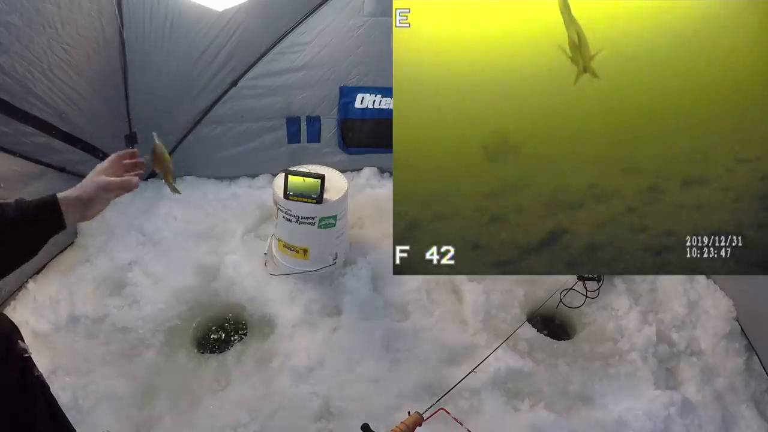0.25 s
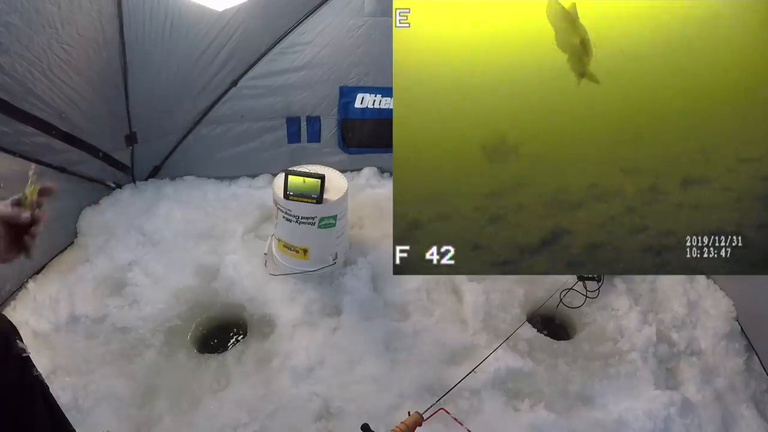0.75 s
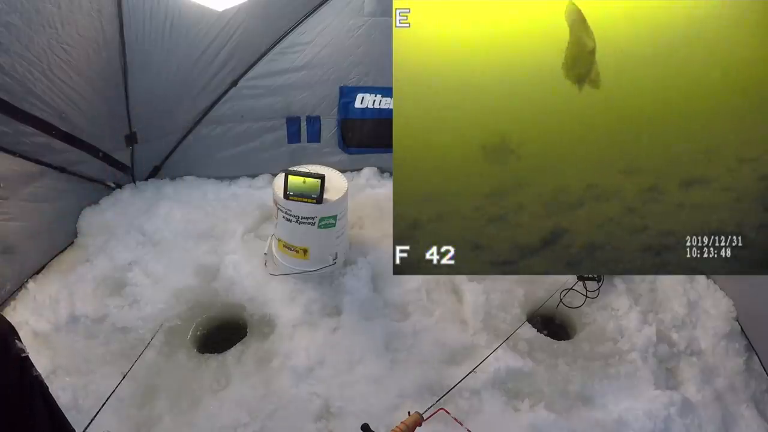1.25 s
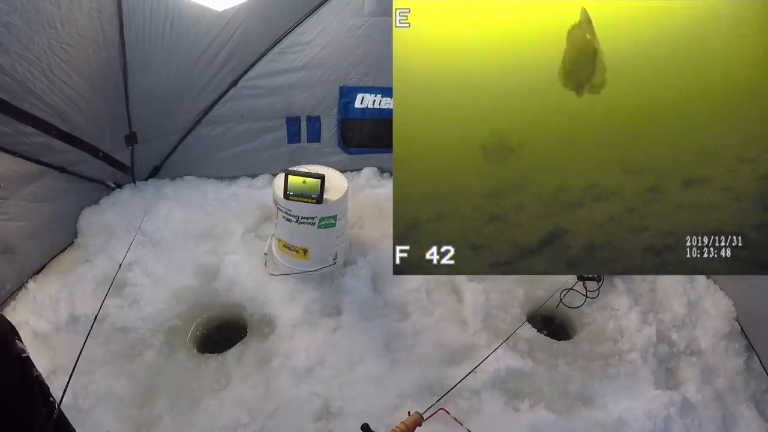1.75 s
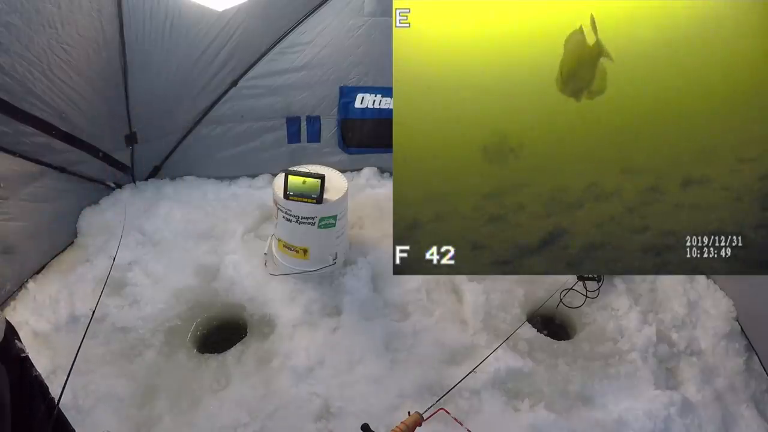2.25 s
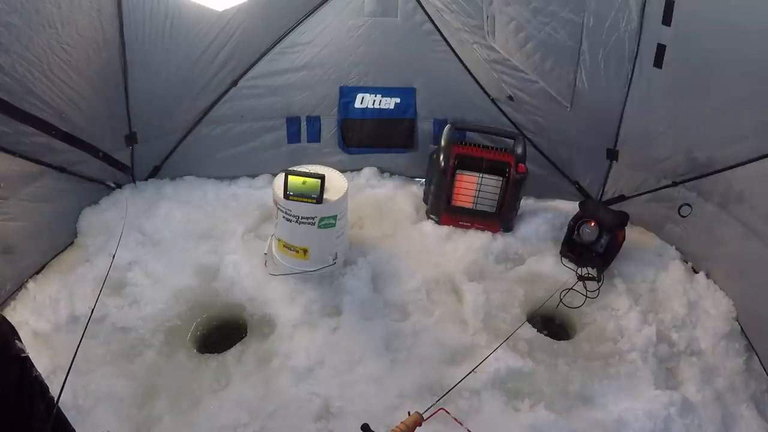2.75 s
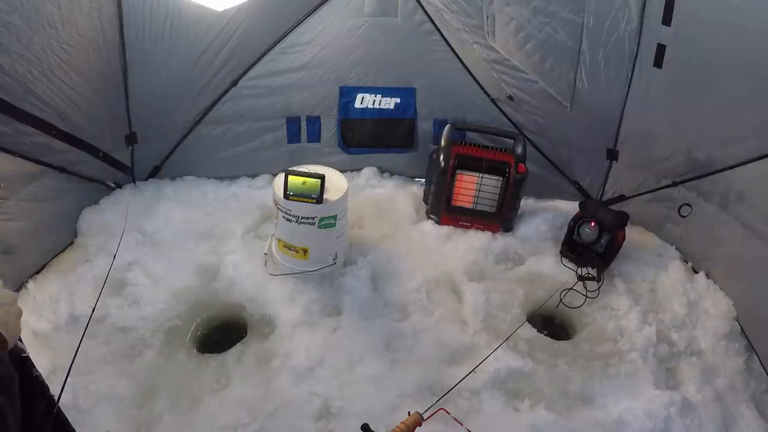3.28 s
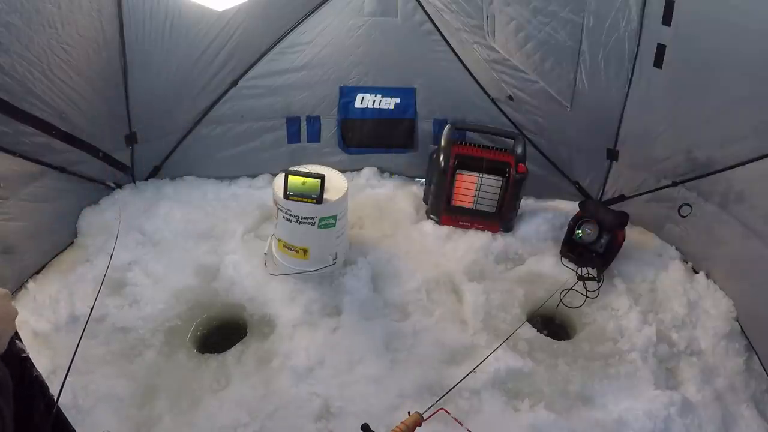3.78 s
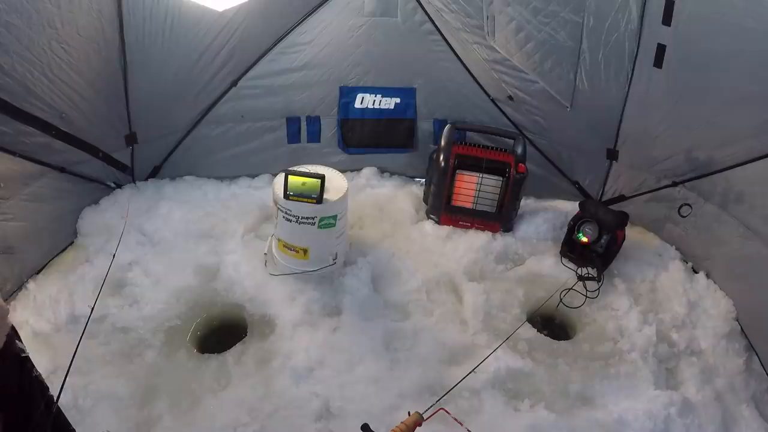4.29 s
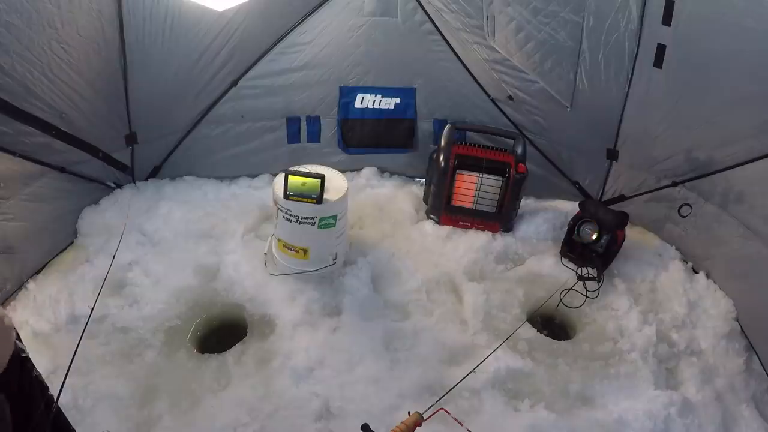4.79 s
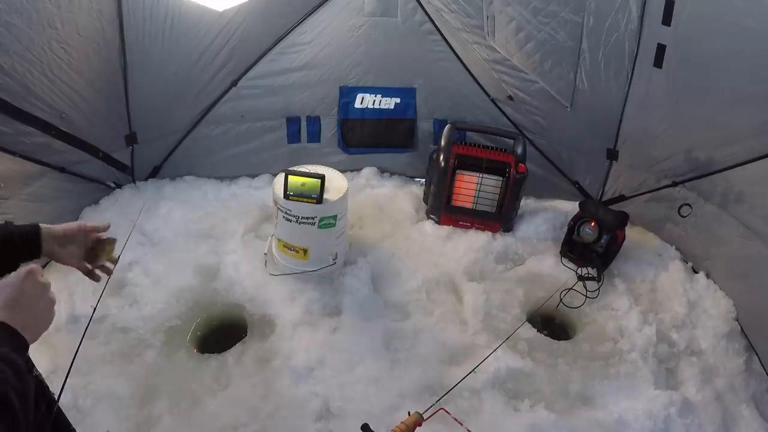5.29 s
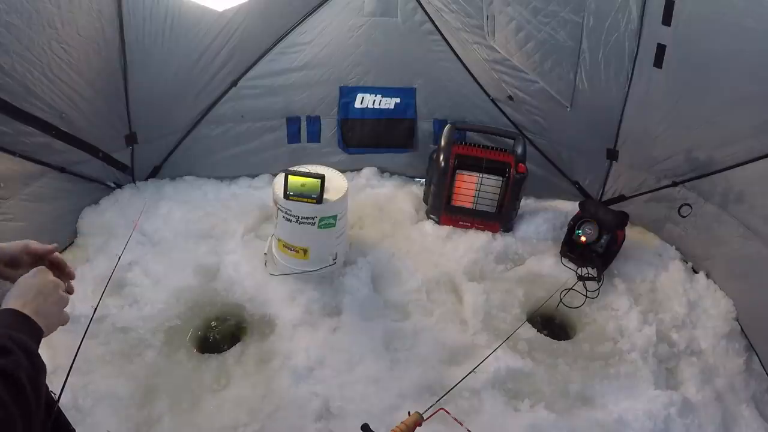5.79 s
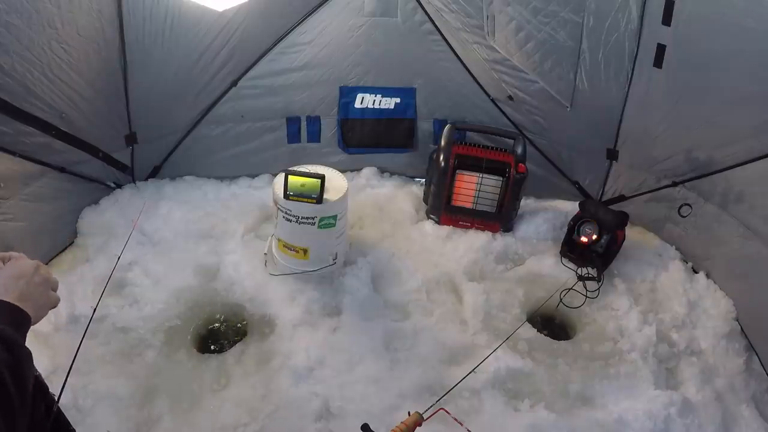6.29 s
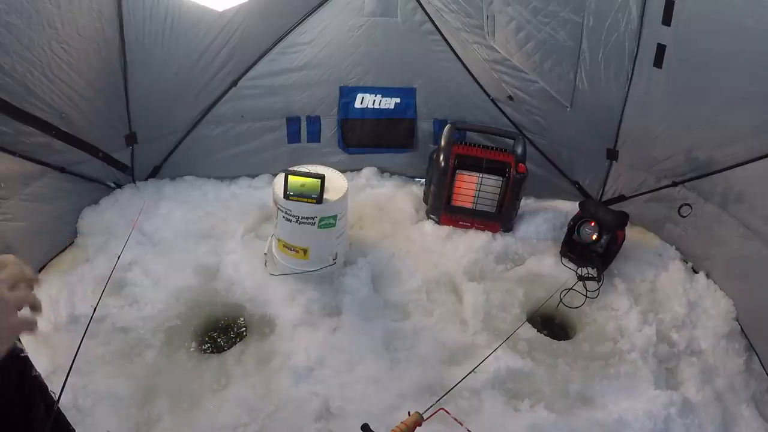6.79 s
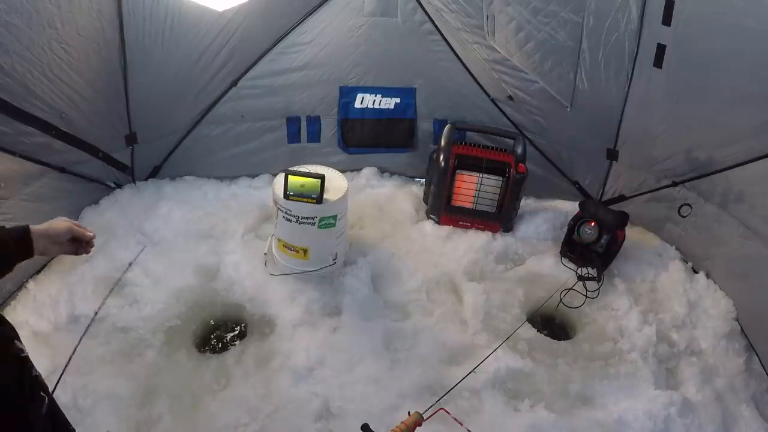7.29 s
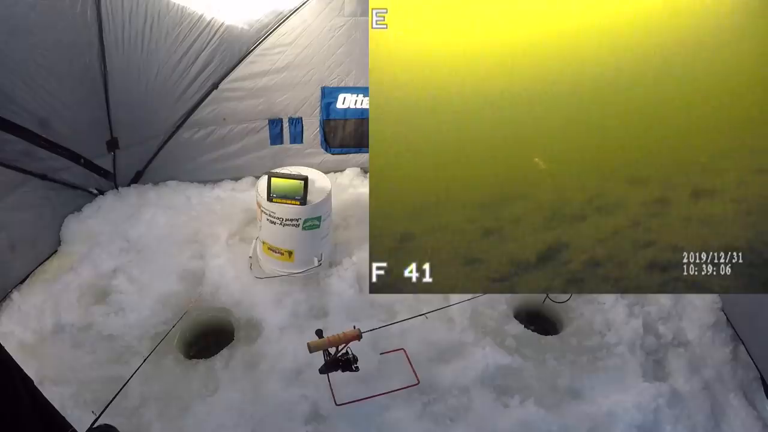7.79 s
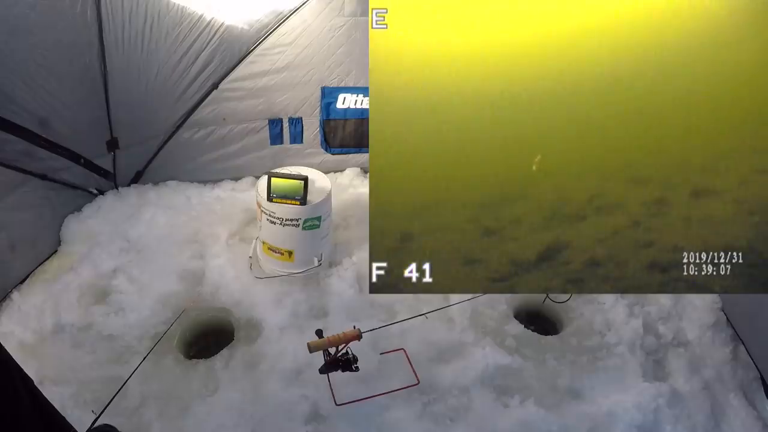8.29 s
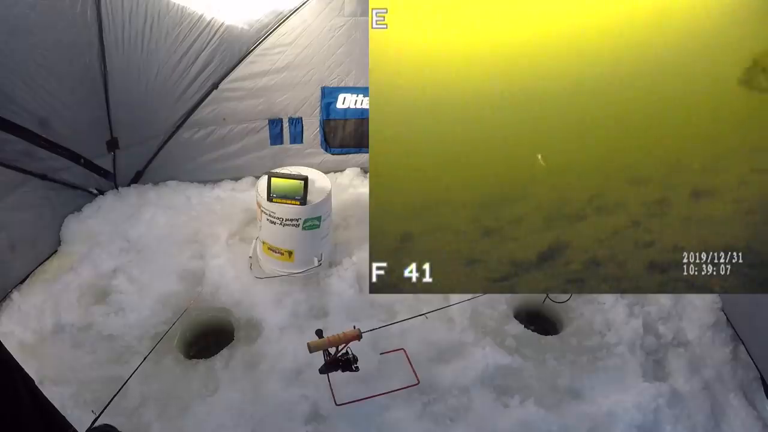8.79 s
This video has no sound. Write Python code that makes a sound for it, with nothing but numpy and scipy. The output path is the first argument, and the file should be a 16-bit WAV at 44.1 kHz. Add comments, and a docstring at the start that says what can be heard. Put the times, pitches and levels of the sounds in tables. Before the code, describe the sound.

A small motor hums steadily over a soft heater roar in a tent; knocks, a plopping splash with bubbles, then rustling and heavy thumps.

```python
"""A small motor spins a wheel and hums, over the soft roar of a gas heater, inside an ice-fishing tent.
The hum is sines on multiples of the turn rate; the roar and the deep rumble are coloured noise.
A fish dropped into the hole splashes: spray noise and ringing droplets, then bubbles of climbing pitch.
Clothes and boots rustle as grainy noise, dull knocks ring and die, wet ticks are short puffs of noise,
and a seat groans once by stick-slip. Two close microphone ports hear it all and add hiss."""
import sys
import numpy as np
from scipy import signal
from scipy.fft import rfft, irfft, next_fast_len
from scipy.io import wavfile
from scipy.ndimage import map_coordinates

SR = 44100
rng = np.random.default_rng(int(sys.argv[2]) if len(sys.argv) > 2 else 0)


def inscribe(sig):
    """Save sig as 16-bit PCM at rate SR to the path in sys.argv[1].

    A 1-D sig is mono; a 2-D sig holds one channel per row.
    Samples are clipped to [-1, 1] before scaling.
    """
    pcm = np.round(np.clip(np.atleast_2d(sig).T, -1, 1) * 32767)
    wavfile.write(sys.argv[1], SR, pcm.astype(np.int16))


N = 399105
T = np.arange(N) / SR
SIZE = next_fast_len(N + SR)   # FFT length, with room for tails
HZ = np.maximum(np.fft.rfftfreq(SIZE, 1 / SR), 1)


def amp(db):
    """dB to gain."""
    return 10 ** (np.asarray(db) / 20)


def rms_one(x):
    """Scale to rms 1."""
    return x / np.sqrt(np.mean(x ** 2))


def at_hz(points, column=1):
    """A column of a spectrum table at every FFT bin, interpolated over log frequency."""
    points = np.array(points)
    return np.interp(np.log(HZ), np.log(points[:, 0]), points[:, column])


def coloured(spectrum, source=None):
    """White noise (or a given source) through a spectrum; rms 1."""
    source = rng.standard_normal(N) if source is None else source
    return rms_one(irfft(rfft(source, SIZE) * amp(at_hz(spectrum)), SIZE)[:N])


def drift(rate):
    """Smooth random curve of spread about 1, with this many random knots per second."""
    knots = rng.standard_normal(400)
    coarse_t = T[::32]
    return np.interp(T, coarse_t, map_coordinates(knots, [coarse_t * rate], order=3, mode="wrap"))


def harmonics(per_s, orders, waver_db, waver_per_s):
    """Sines on multiples of a moving rate, in step once per turn, each wavering by itself."""
    turn = 2 * np.pi * np.cumsum(per_s) / SR
    out = np.zeros(N)
    for order, db in orders:
        level = np.sqrt(2) * amp(db + waver_db * drift(waver_per_s))
        out += level * np.sin(order * turn)
    return out


def swell(peak_s, db, rise, fall):
    """Power that climbs 20 dB in rise seconds to a peak and sinks 20 dB in fall seconds."""
    t = T[::16]
    away = np.maximum((peak_s - t) / rise, (t - peak_s) / fall)
    return np.interp(T, t, amp(2 * db - 40 * away))   # doubled dB: power, not amplitude


def band_noise(noise, low_hz, high_hz):
    """Noise kept between two band edges."""
    return signal.sosfilt(signal.butter(2, [low_hz, high_hz], "band", fs=SR, output="sos"), noise)


def add(out, s, sound):
    """Mix a short sound in at s seconds."""
    i = round(s * SR)
    out[i:i + len(sound)] += sound[:N - i]


TENT_T60_S, BLEND_KNOTS_PER_S = .09, 20
# How the left microphone port hears, against the right one.
# Columns: freq_hz, level_db, lead_rad, direct_share (share of the power in the left port, 0 to 1)
PORTS = [(100, 0, 0, 1), (300, -1.2, -.22, 1), (450, -3.5, -.4, 1), (560, -8, -.45, 1), (700, -15, -.3, .9),
         (800, -15, 1.6, .88), (900, -11, 1.9, .9), (1200, -3, 2.0, .8), (2000, 0, 1.2, .5),
         (3000, -1, 0, .3), (6000, 2, 0, .2), (12000, 1, 0, .1)]


def ports(x):
    """Two close ports: the left one has a dip and a phase turn; it also hears more of the tent walls."""
    t = np.arange(SR // 4) / SR
    # twelve patterns of echoes, each with its own left and right
    walls = rng.standard_normal((12, 2, len(t))) * amp(-60 * t / TENT_T60_S)
    walls /= np.sqrt(np.sum(walls ** 2, axis=2, keepdims=True))
    # the blend of echo patterns keeps changing at random, so no fixed colour stands out
    blend = np.array([amp(8 * drift(BLEND_KNOTS_PER_S)) for _ in walls])
    blend /= np.sqrt(np.sum(blend ** 2, axis=0))
    echoes = np.sum(rfft(x * blend, SIZE)[:, None] * rfft(walls, SIZE), axis=0)
    left = amp(at_hz(PORTS)) * np.exp(1j * at_hz(PORTS, column=2))
    left_share = at_hz(PORTS, column=3)
    share = np.array([left_share, (2 + left_share) / 3])
    heard = np.sqrt(share) * rfft(x, SIZE) + np.sqrt(1 - share) * echoes
    heard = heard * [left, np.ones_like(left)]
    # levels are given for the mean of both ports
    mean = np.sqrt(1 + abs(left) ** 2 + 2 * left.real * np.sqrt(share[0] * share[1])) / 2
    return irfft(heard / mean, SIZE)[:, :N]


HISS_MID_DB, HISS_SIDE_DB = -60, -50.5
# Colour of the hiss common to both ports. Columns: freq_hz, density_db (dB per Hz, relative)
HISS_MID = [(590, -9), (1000, -6), (1180, -2), (1340, -2), (2120, -6.5), (3540, -9), (4000, -11.5),
            (8860, -9.5), (13100, -19), (14500, -32)]
# Colour of the hiss opposed between the ports. Columns: freq_hz, density_db (dB per Hz, relative)
HISS_SIDE = [(100, -51), (140, 7.5), (300, 4.5), (600, -2), (750, 4.5), (985, 1.5), (1380, -4), (3080, -17),
             (3570, -21), (8720, -16), (12800, -26), (14500, -36)]


def hiss():
    """Steady microphone noise, one part equal in both ports and one of opposite sign."""
    common = amp(HISS_MID_DB) * coloured(HISS_MID)
    opposed = amp(HISS_SIDE_DB) * coloured(HISS_SIDE)
    return common + opposed * [[1], [-1]]


RUMBLE_START_DB, RUMBLE_FADE_DB_PER_S, RUMBLE_FLOOR_DB = -42, 12.5, -69.5   # dies away from the start
RUMBLE_BACK_S, RUMBLE_BACK_DB, RUMBLE_RISE_DB_PER_S = 8.88, -43.5, 70   # fully back from this time on
RUMBLE_SIDE_DB = -25   # part that differs between the ports, against the common part
# Colour of the deep shaking. Columns: freq_hz, density_db (dB per Hz, relative)
RUMBLE_COLOUR = [(8, -30), (20, -11), (36, -8), (46, -2), (52, -4), (59, 0), (68, -7), (100, -10),
                 (125, -25), (300, -110)]


def rumble():
    """Deep shaking noise that settles slowly and comes back at the end."""
    settling = amp(RUMBLE_START_DB - RUMBLE_FADE_DB_PER_S * T) + amp(RUMBLE_FLOOR_DB)
    back = amp(RUMBLE_BACK_DB - RUMBLE_RISE_DB_PER_S * np.maximum(RUMBLE_BACK_S - T, 0))
    common = coloured(RUMBLE_COLOUR)
    opposed = amp(RUMBLE_SIDE_DB) * coloured(RUMBLE_COLOUR)
    return (settling + back) * (common + opposed * [[1], [-1]])


ROAR_DB = -42.5
# Colour of the gas heater's roar. Columns: freq_hz, density_db (dB per Hz, relative)
ROAR = [(90, -73), (120, -12.5), (142, 1), (260, 0.5), (300, 1.5), (400, -2.5), (500, -1.5), (620, -2),
        (700, -8), (850, -14.5), (1100, -23.5), (2000, -35.5), (4000, -79)]


def heater():
    """The gas heater roars softly: low coloured noise whose level drifts a little."""
    return amp(ROAR_DB + 1.0 * drift(4.8)) * coloured(ROAR)


GROAN_S, GROAN_HALF_S = 8.643, .036   # slowest moment; this long before and after, slips are twice as fast
GROAN_SLIPS_PER_S, GROAN_DB, GROAN_FADE_DB = 330, -17, 18   # at the slowest; quieter by this at twice the rate
GROAN_UNEVEN = 0.035   # share by which the slip rate stumbles
# Harmonics of the groaning seat's slip rate. Columns: order, level_db (relative)
GROAN_ORDERS = [(1, 2), (2, -27)]


def groan():
    """Stick-slip of a seat: the slips stumble, slow down under load, then speed up and fade."""
    slack = np.minimum(((T - GROAN_S) / GROAN_HALF_S) ** 2, 6)
    per_s = GROAN_SLIPS_PER_S * (1 + slack) * (1 + GROAN_UNEVEN * drift(120.0))
    level = amp(GROAN_DB - GROAN_FADE_DB * slack)
    return level * harmonics(per_s, GROAN_ORDERS, waver_db=2.0, waver_per_s=110)


TICK_SKIRT_DB = -6.5   # a broad crack at the start of each
# Wet ticks. Columns: start_s, level_db, pitch_hz, edge_ratio (band edges against the pitch), t60_s
TICKS = [(.465, -56, 6200, 1.15, .09), (0.642, -46, 7060, 1.24, 0.083), (3.031, -54, 6300, 1.25, .12),
         (3.043, -51, 4870, 1.1, 0.1), (4.309, -53.5, 5710, 1.3, .08), (4.818, -46, 5770, 1.14, 0.12),
         (5.815, -58, 3500, 1.1, .08), (5.892, -56, 3600, 1.5, .04), (5.902, -61, 4400, 1.3, .05),
         (6.218, -53, 4470, 1.26, .045), (6.335, -54.5, 6660, 1.2, .09), (6.57, -57, 6560, 1.1, .09),
         (6.602, -56, 5500, 1.2, 0.083)]


def ticks():
    """Short puffs of noise in a band around each pitch; the narrow ones ring."""
    out, t = np.zeros(N), np.arange(SR // 4) / SR
    ragged_db = 2.5 * drift(150.0)
    for start_s, db, hz, ratio, t60 in TICKS:
        noise = rng.standard_normal(len(t))
        ring = rms_one(band_noise(noise, hz / ratio, hz * ratio))
        crack = rms_one(band_noise(noise, hz / 2, hz * 1.7))
        fall_db = -60 * t / t60
        level = amp(db + fall_db + ragged_db[round(start_s * SR):][:len(t)])
        # the crack dies four times as fast as the ring
        add(out, start_s, level * (ring + amp(TICK_SKIRT_DB + 3 * fall_db) * crack))
    return out


SWISH_PATCH_DB, SWISH_PATCH_PER_S = 1.7, 22


def patchy(x):
    """Folds of cloth rub in turn: neighbouring treble bands swell and sink each by itself; rms 1."""
    spectrum, centres = rfft(x, SIZE), np.geomspace(2000, 11000, 7)
    place = np.interp(np.log(HZ), np.log(centres), np.arange(7))
    out = np.zeros(N)
    for k in range(7):
        share = np.maximum(1 - abs(place - k), 0)   # overlapping bands that add up to the whole
        out += amp(SWISH_PATCH_DB * drift(SWISH_PATCH_PER_S)) * irfft(spectrum * share, SIZE)[:N]
    return rms_one(out)


SCRAPE_OVER_DB, THUD_OVER_DB = 14.5, 15   # above the swish
THUD_FOLLOWS = 0.23   # share of the weight in the thud
# Colours of four kinds of friction. Columns of each: freq_hz, density_db (dB per Hz, relative)
RUSTLE_THUD = [(110, -20), (150, -2.5), (330, 2.5), (480, 5), (700, -41), (1500, -54)]
RUSTLE_SCRAPE = [(400, -4), (600, 9), (850, 1), (1100, -10), (1500, -20.5), (3000, -59)]
RUSTLE_SCRATCH = [(600, -10), (850, 1.5), (1200, 2), (2000, -1), (2400, -11.5), (3200, -11), (4500, -29)]
RUSTLE_SWISH = [(1800, -16), (2700, -5), (3800, 4.5), (6500, 6.5), (8000, -1.5), (9500, -6.5), (14000, -20)]
# Strokes of clothes and boots. Columns: peak_s, swish_db, rise_s, fall_s (time for 20 dB),
# weight_db (boosts scrape and thud), scratch_db (boosts scratch)
RUSTLE = [(1.168, -54, 0.003, 0.089, 5.5, 6), (1.23, -59, 0.076, 0.14, 0, 6.5),
          (1.275, -60, .03, 0.067, 4, 0), (1.37, -51, 0.22, 0.16, -5, 2.5), (1.42, -59, 0.1, 0.14, -12, 6),
          (1.49, -64, .05, .06, -2, 5), (1.54, -61, 0.067, 0.044, -6, -3), (7.05, -64, 0.092, 0.25, 0, 0),
          (7.21, -58.5, 0.1, .1, -1, 1), (7.283, -52.5, 0.055, 0.11, 1.5, 3.5),
          (7.328, -56.5, 0.0092, 0.041, 0, 17), (7.34, -59, 0.033, 0.064, 1, 4.5),
          (7.44, -58, 0.049, 0.075, 9, 8), (7.6, -58.5, 0.26, 0.3, 2, 4),
          (7.69, -63.5, 0.011, .08, 16.5, 10), (7.76, -55.5, 0.2, 0.087, 4, 1.5),
          (7.91, -56, 0.17, 0.094, -1, 6.5), (7.97, -59.5, 0.044, 0.12, 12.5, 5),
          (8.03, -54, 0.22, 0.1, -3.5, 1.5), (8.16, -63.5, 0.23, .15, 2, 5.5),
          (8.29, -54, 0.26, 0.17, -1, 0.5), (8.599, -49, .005, 0.056, 6, -7),
          (8.62, -45.5, 0.033, 0.36, -4.5, -3.5), (8.71, -50, 0.13, 0.25, -6, -16),
          (8.81, -47, 0.19, 0.09, -6, -4.5), (8.94, -51, 0.081, 0.13, -2, -5), (9.0, -63, .08, .06, -6, -7),
          (9.05, -59, .12, .1, -1, -2)]


def rustle():
    """Dense uneven grains of friction, heard as a low thud, a dull scrape, a dry scratch and a bright swish."""
    grains = rng.standard_normal((4, N)) * amp(1.8 * rng.exponential(1, (4, N)))
    thud = coloured(RUSTLE_THUD, grains[0])
    scrape = coloured(RUSTLE_SCRAPE, grains[1])
    scratch = coloured(RUSTLE_SCRATCH, grains[2])
    swish = patchy(coloured(RUSTLE_SWISH, grains[3]))
    strokes = np.array([swell(*row[:4]) for row in RUSTLE])
    weight_db, scratch_db = np.array(RUSTLE)[:, 4:].T

    def envelope(boost_db):
        """Powers of all strokes summed, each with its boost; as a gain."""
        return np.sqrt(amp(2 * boost_db) @ strokes)

    catch_db = drift(45.0)   # the cloth catches and slips
    out = amp(THUD_OVER_DB) * envelope(THUD_FOLLOWS * weight_db) * thud
    out += amp(SCRAPE_OVER_DB + 2.0 * drift(35.0)) * envelope(weight_db) * scrape
    out += amp(1.83 * catch_db) * envelope(scratch_db) * scratch
    out += amp(0.68 * catch_db) * envelope(0 * weight_db) * swish
    return out


KNOCK_T60_S, T60_PER_CONTACT = 0.022, 11.2   # softer, heavier blows (longer contact) ring longer
T60_PITCH_LAW = 0.063   # and higher ones shorter
# Dull knocks. Columns: start_s, level_db, pitch_hz, contact_s (how slowly the blow builds)
KNOCKS = [(1.224, -21, 525, 0.00062), (1.313, -19, 310, 0.0022), (1.328, -19.5, 338, 0.0033),
          (1.37, -23, 339, 0.0067), (4.188, -21.5, 274, 0.0072), (4.211, -25.5, 418, 0.0067),
          (4.275, -29, 287, 0.014), (4.31, -28.5, 328, 0.004), (4.37, -34, 280, 0.0065),
          (4.544, -27.5, 291, 0.0092), (4.62, -21, 241, 0.0051), (4.635, -19, 311, 0.0098),
          (4.65, -26, 366, 0.009), (4.668, -28, 286, 0.0039), (4.7, -26, 290, .005),
          (4.774, -22, 310, 0.0066), (5.622, -24, 190, 0.0026), (5.64, -26, 306, 0.0016),
          (6.088, -22.5, 303, 0.0015), (7.184, -21.5, 293, 0.0052), (7.261, -18.5, 530, 0.0011),
          (7.327, -26, 1094, 0.0022), (7.422, -21.5, 392, 0.0019), (7.568, -23, 474, 0.0033),
          (7.686, -18.5, 454, 0.00063), (7.773, -18, 550, 0.0012), (7.888, -21.5, 328, 0.0051),
          (7.962, -22, 467, 0.00097), (7.974, -19, 380, 0.0031), (8.302, -23, 706, 0.0037),
          (8.594, -10.5, 302, 0.00042), (8.595, -15.5, 685, 0.00099), (8.604, -17, 467, .002),
          (8.625, -3.5, 166, 0.0052), (8.645, -8, 172, 0.0023), (8.705, -27.5, 950, 0.0044),
          (8.73, -21, 448, 0.013), (8.759, -16.5, 195, 0.0018), (8.797, -14.5, 227, 0.0015),
          (8.806, -24, 402, .002), (8.925, -28, 930, 0.0011), (8.927, -13.5, 200, 0.0008),
          (8.943, -25, 640, 0.0014), (8.944, -11.5, 284, 0.0003)]


def knocks():
    """Each knock rings at its pitch and, weaker and shorter, at two looser overtones, over a dull puff."""
    out, t = np.zeros(N), np.arange(SR // 3) / SR
    for start_s, db, hz, contact in KNOCKS:
        noise = rng.standard_normal(len(t))
        t60 = (KNOCK_T60_S + T60_PER_CONTACT * contact) * (350 / hz) ** T60_PITCH_LAW
        attack = 1 - np.exp(-t / contact)
        soft_db = -900 * contact   # a slow contact hardly stirs the overtones
        second_hz = (1.4 + 0.194 * noise[0]) * hz
        third_hz = (2.0 + 0.43 * noise[1]) * hz
        ring = amp(-60 * t / t60) * np.sin(2 * np.pi * hz * t)
        ring += amp(soft_db - 13 - 120 * t / t60) * np.sin(2 * np.pi * second_hz * t)
        ring += amp(2 * soft_db - 19 - 120 * t / t60) * np.sin(2 * np.pi * third_hz * t)
        puff = rms_one(signal.sosfilt(signal.butter(2, 1.3 * hz, fs=SR, output="sos"), noise))
        add(out, start_s, amp(db) * attack * (ring + amp(-20.0 - 70 * t / t60) * puff))
    return out


def droplets(per_s, cycles):
    """Tiny drops fall at random; each rings some cycles at one of 40 pitches, high ones loudest; rms 1."""
    sizes = (rng.random(N) < per_s / SR) * amp(4 * np.minimum(rng.exponential(1, N), 3))
    dealt, out = rng.integers(0, 40, N), np.zeros(N)   # which pitch each drop gets
    for k, hz in enumerate(np.geomspace(1500, 7800, 40)):
        r, w = amp(-60 * hz / cycles / SR), 2 * np.pi * hz / SR   # decay per sample, radians per sample
        hits = sizes * (dealt == k) + 1e-18   # the trace keeps the filter out of slow tiny numbers
        out += signal.lfilter([hz * np.sin(w)], [1, -2 * r * np.cos(w), r * r], hits)
    return rms_one(out)


FINE_SPRAY_DB = -22   # against the burst
# Colours of splash and fine spray. Columns of each: freq_hz, density_db (dB per Hz, relative)
SPLASH_COLOUR = [(88, -48), (150, -6.5), (450, -3), (578, 4.5), (866, -7), (1010, -4), (1400, -19),
                 (1900, -23), (2600, -24), (3600, -23), (5840, -10.5), (7500, -15), (8500, -40),
                 (12000, -60)]
FINE_SPRAY = [(6000, -25), (8200, -7), (11000, -3), (13500, -4), (15000, -7)]
# Bursts of the splash. Columns: peak_s, level_db, rise_s, fall_s (time for 20 dB),
# fine_db (extra level of the fine spray)
SPLASH = [(5.618, -26, .002, .02, -3), (5.622, -21, 0.004, 0.021, 2), (5.628, -26.5, 0.0054, 0.014, 0),
          (5.642, -30.5, 0.014, 0.029, 1), (5.66, -34.5, .02, 0.038, 1), (5.685, -49, .03, 0.038, 4),
          (5.716, -35, 0.021, 0.014, 0), (5.735, -40, 0.013, .03, -6), (5.75, -40, 0.033, 0.028, -3),
          (5.785, -55, .04, 0.09, -3)]


def splash():
    """The fish hits the water: bursts of spray noise, ringing droplets and a fine high spray."""
    spray = amp(2.5 * drift(150.0)) * coloured(SPLASH_COLOUR)
    spray += amp(-2) * droplets(per_s=1000, cycles=24)
    bursts = np.array([swell(*row[:4]) for row in SPLASH])
    fine_db = FINE_SPRAY_DB + np.array(SPLASH)[:, 4]
    fine = np.sqrt(amp(2 * fine_db) @ bursts) * coloured(FINE_SPRAY)
    return np.sqrt(bursts.sum(axis=0)) * spray + fine


BUBBLE_RISE_PER_S = 0.66   # share by which the pitch climbs each second
BUBBLE_WOBBLE_DB, BUBBLE_WOBBLE_TURNS = 3.0, .15   # full flutter, reached by the small bubbles
# Bubbles and drops. Columns: start_s, level_db, pitch_hz, t60_s
BUBBLES = [(0.586, -34, 1130, 0.02), (0.589, -43, 1600, 0.02), (5.619, -44, 7450, .04),
           (5.62, -28, 5000, .035), (5.623, -8, 319, 0.036), (5.622, -11, 674, 0.026),
           (5.623, -22.5, 963, 0.086), (5.624, -26.5, 5820, 0.069), (5.641, -33, 6030, .03),
           (5.648, -36, 4250, .04), (5.655, -34, 6050, .035), (5.657, -38, 4200, .03),
           (5.667, -29.5, 3170, 0.035), (5.679, -32, 3500, .02), (5.707, -33, 3150, .02),
           (5.715, -35, 3150, .02), (5.679, -33, 2424, 0.075), (5.714, -37, 1490, 0.11),
           (5.736, -41, 6800, .02), (5.735, -36, 3000, .05), (5.743, -35, 5780, 0.028),
           (5.748, -31, 2030, 0.037), (5.751, -36.5, 6940, 0.027), (5.751, -8, 750, 0.016),
           (5.7555, -6, 825, 0.032), (5.775, -18, 872, 0.027), (5.901, -42.5, 2856, 0.056),
           (6.207, -30, 710, 0.092), (6.219, -37.5, 2900, 0.051), (6.24, -34, 950, 0.055),
           (6.286, -19.5, 796, 0.11), (6.304, -28, 840, 0.13), (6.333, -27, 717, 0.081),
           (6.598, -44.5, 1050, 0.089)]


def bubbles():
    """Ringing bubbles whose pitch climbs as they near the surface; choppy water makes them flutter."""
    out, t = np.zeros(N), np.arange(SR // 4) / SR
    wobble = np.array([drift(170.0), drift(200.0)])   # of phase and of level
    for start_s, db, hz, t60 in BUBBLES:
        noise = rng.standard_normal(len(t))
        flutter = min(.1 + hz / 3500, 1) * wobble[:, round(start_s * SR):][:, :len(t)]
        turns = hz * t * (1 + BUBBLE_RISE_PER_S * t / 2) + BUBBLE_WOBBLE_TURNS * flutter[0]
        attack = 1 - np.exp(-hz * t / 2)
        tone = attack * amp(BUBBLE_WOBBLE_DB * flutter[1]) * np.sin(2 * np.pi * turns)
        # the breaking film spits a little spray around and above the tone, more for small bubbles
        spit = rms_one(band_noise(noise, hz * .8, min(hz * 2.2, 9000)))
        spit_gain = max(.7 * min(hz / 5000, 1) ** 2, .035)
        add(out, start_s, amp(db - 60 * t / t60) * (tone + spit_gain * spit))
    return out


WHEEL_DB = -39.5   # level of the loudest order
# Speed of the wheel. Columns: time_s, rate_turns_per_s
WHEEL = [(0, 37.48), (5.5, 37.42), (7.1, 37.46), (7.5, 37.26), (9.05, 37.38)]
# Tones of the wheel. Columns: order (multiple of the turn rate), level_db (against the loudest)
WHEEL_ORDERS = [(8, -11), (9, -13), (11, -17), (12, -24), (14, -8.5), (15, 0), (16, -23), (17, -25),
                (18, -25), (23, -27)]


def motor():
    """The spinning wheel sings on some multiples of its turn rate."""
    time_s, turns_per_s = np.transpose(WHEEL)
    per_s = np.interp(T, time_s, turns_per_s)
    return amp(WHEEL_DB) * harmonics(per_s, WHEEL_ORDERS, waver_db=1.2, waver_per_s=7.3)


LOW_CUT_HZ = 120


def scene():
    """Everything in the tent reaches the ports through a low cut; rumble shakes both nearly alike."""
    air = heater() + groan() + ticks() + rustle() + knocks() + splash() + bubbles() + motor()
    air = signal.sosfilt(signal.butter(6, LOW_CUT_HZ, "high", fs=SR, output="sos"), air)
    return ports(air) + rumble()


TOP_STOP_HZ = 15600   # 70 dB down from here up


def record(dry):
    """The microphone adds its hiss; the top is cut."""
    top_cut = signal.cheby2(12, 70, TOP_STOP_HZ, fs=SR, output="sos")
    return signal.sosfilt(top_cut, dry + hiss())


dry = scene()
out = record(dry)
inscribe(out)
```